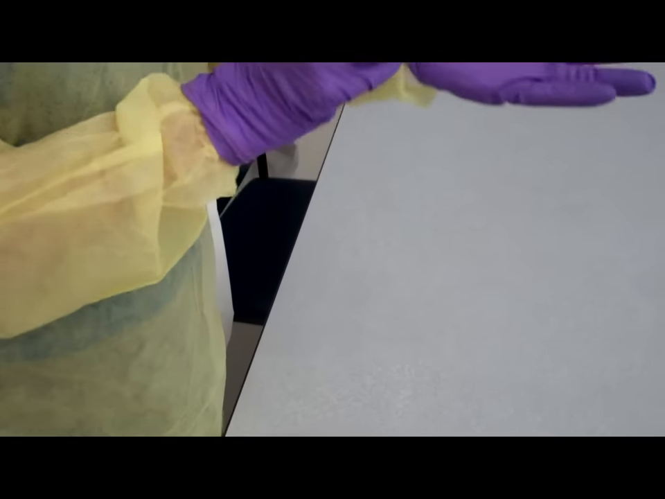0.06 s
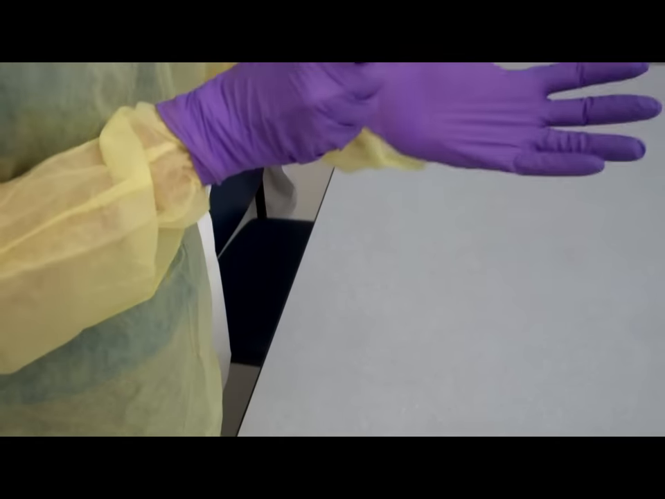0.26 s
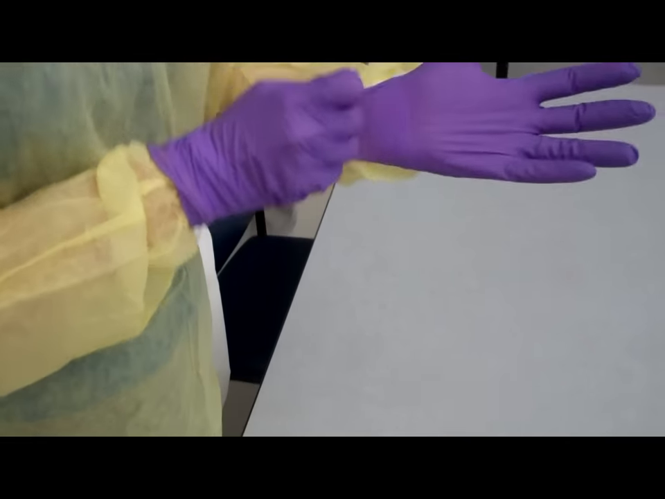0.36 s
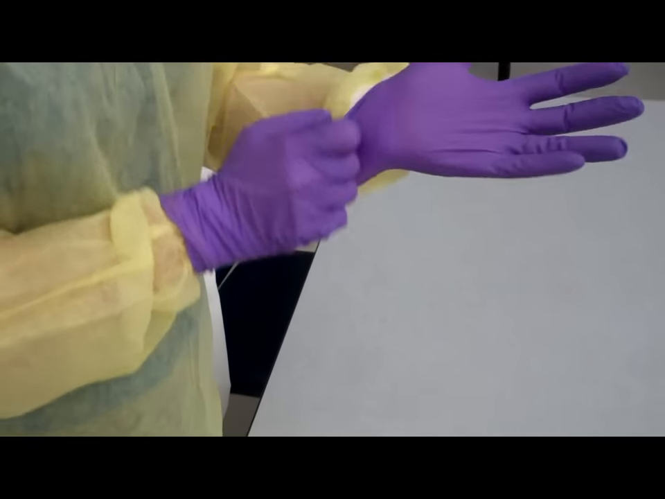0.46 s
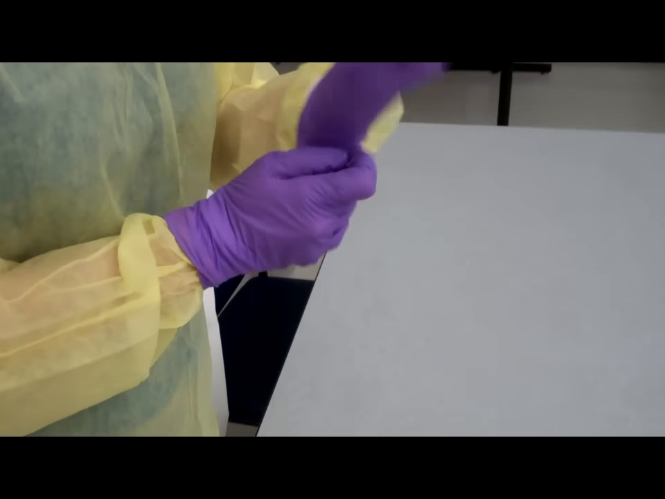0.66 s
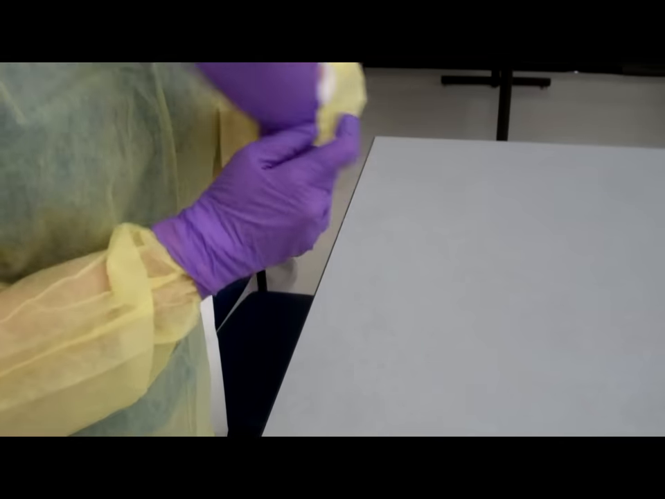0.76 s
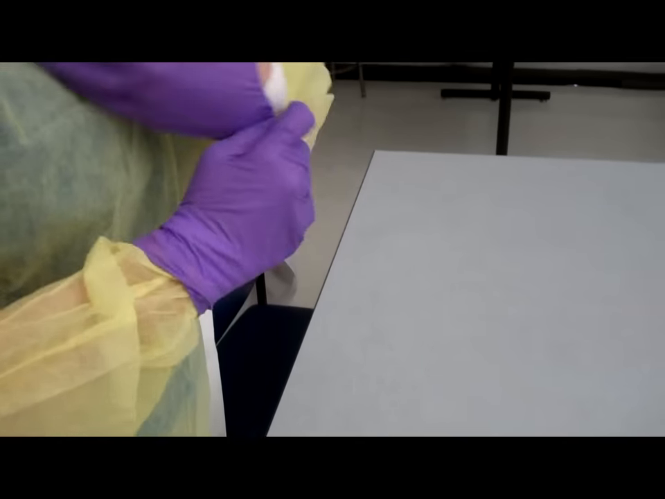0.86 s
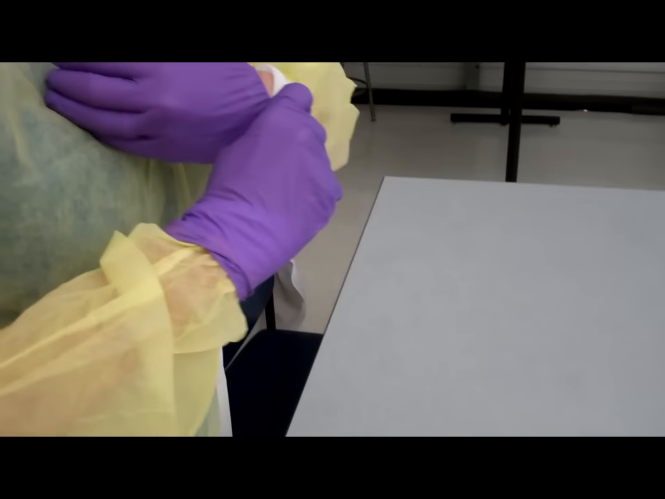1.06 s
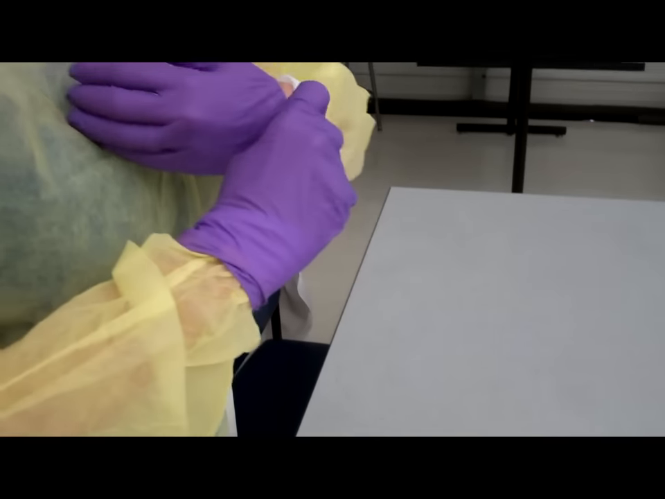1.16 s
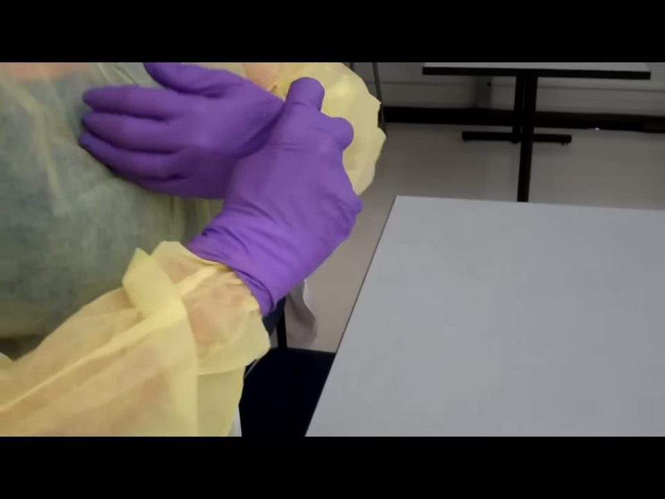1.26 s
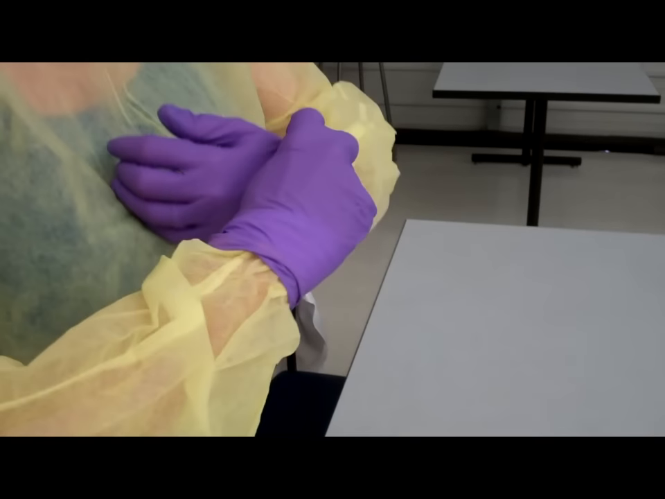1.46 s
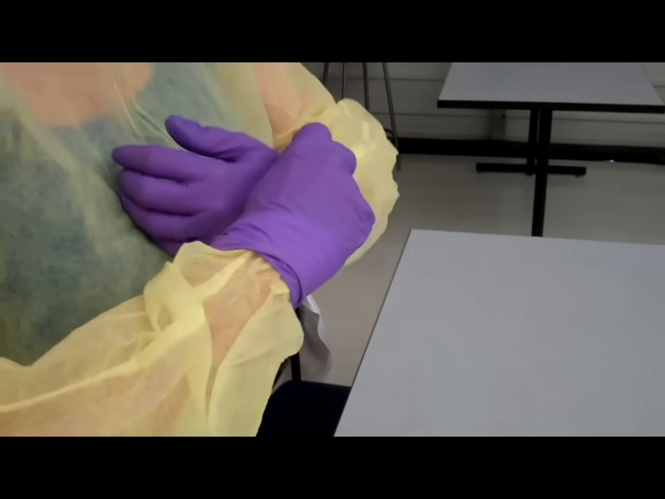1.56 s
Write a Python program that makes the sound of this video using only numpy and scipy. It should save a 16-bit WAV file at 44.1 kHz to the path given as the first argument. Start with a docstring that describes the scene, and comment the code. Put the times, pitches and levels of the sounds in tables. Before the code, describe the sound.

One sharp, close snap of a rubber glove cuff, then soft sliding and cloth rustle.

```python
"""A faint brush of rubber and cloth over humming ventilation, then one sharp snap, close to the microphone.
In a quiet room, beside a table, someone in a thin protective gown pulls on a rubber glove.
The stretched cuff slaps the wrist, and the table top and the walls answer. The gloves then slide over
the sleeves while the gown rustles and creases. In stereo: the snap in the centre, the room around it."""
import sys
import numpy as np
from scipy import signal
from scipy.fft import rfft, irfft
from scipy.io import wavfile

SR = 44100
rng = np.random.default_rng(int(sys.argv[2]) if len(sys.argv) > 2 else 0)


def generate_wav(sig):
    """Save sig (samples, or channels by samples) to the path in sys.argv[1] as 16-bit PCM at SR."""
    pcm = np.round(np.clip(np.atleast_2d(sig).T, -1, 1) * 32767).astype(np.int16)
    wavfile.write(sys.argv[1], SR, pcm)


N = 70560
TIME = np.arange(N) / SR
BIN_HZ = np.arange(N // 2 + 1) * SR / N
CUTOFF_HZ = 14350

# diffuse sound at the microphone, side against mid: f/Hz, level/dB
STEREO_WIDTH = [(60, -20), (200, -21.5), (400, -15), (700, -13), (1300, -8.5), (2400, -4.5), (4400, 0),
                (14000, 3)]
# spectrum of the ventilation's moving air: f/Hz, relative level/dB
AIR_SPECTRUM = [(25, -20), (55, -9), (85, -4.5), (140, -2.5), (260, 0), (450, -4), (850, -7), (1500, -9),
                (2500, -18), (4500, -24.5), (8000, -28), (14000, -24)]
# tones of the ventilation's hum: f/Hz, rms level/dB
HUM_TONES = [(59, -67), (144, -65), (216, -61.5), (288, -62), (360, -63.5), (656, -65.5), (894, -65)]

# soft rustle as the gown moves: t/s, level/dB
RUSTLE_LEVELS = [(0, -47.5), (.12, -49.5), (.2, -45.5), (.26, -49), (.36, -47), (.45, -53.5), (.53, -44.5),
                 (.61, -48.5), (.69, -45.5), (.78, -57), (.84, -58.5), (.9, -51), (1.02, -57), (1.11, -49),
                 (1.2, -52.5), (1.255, -47), (1.39, -57.5), (1.46, -50), (1.51, -46), (1.6, -54)]
# spectrum of the rustling cloth: f/Hz, relative level/dB
RUSTLE_SPECTRUM = [(60, -13), (140, 3), (260, 1), (450, -1), (800, 0), (1400, -3), (2200, -7),
                   (4000, -21.5), (8000, -26.5), (14000, -26)]
# folds of the gown pushing air: t/s, level/dB, half length/s
FOLD_PUFFS = [(.025, -45, 0.018), (.18, -49, 0.03), (.32, -51, 0.04), (1.12, -49, 0.043),
              (1.515, -49.5, 0.024), (1.58, -52, 0.018)]
# spectrum of those low puffs: f/Hz, relative level/dB
PUFF_SPECTRUM = [(50, -17), (100, -0.5), (150, 0), (260, 1.5), (400, -11.5), (800, -12), (2000, -25),
                 (8000, -60)]
# creases that flip: t/s, level/dB, f/Hz, t60/s
CREASE_FLIPS = [(1.2675, -40.5, 3350, .022), (1.327, -42, 3900, 0.025)]

# hiss of rubber sliding over the sleeve: t/s, level/dB
SLIDE_LEVELS = [(0, -49), (.04, -59.5), (.065, -54), (.135, -58.5), (.16, -82), (.21, -57), (.25, -49),
                (.31, -52.5), (.37, -46.5), (.42, -51.5), (.455, -59.5), (.5, -51.5), (.58, -49),
                (.61, -42), (.64, -44.5), (.68, -43.5), (.7, -47.5), (.75, -43), (.792, -45.5),
                (.81, -53.5), (.875, -56), (.91, -47.5), (.94, -54.5), (.98, -56.5), (1.08, -61.5),
                (1.2, -71), (1.26, -56), (1.31, -63), (1.35, -53), (1.39, -55), (1.44, -48.5), (1.49, -58),
                (1.6, -66)]
# spectrum of that hiss: f/Hz, relative level/dB
SLIDE_SPECTRUM = [(600, -6.5), (1500, -6.5), (2500, -1), (3800, 1), (5200, -1), (7500, -1), (10000, -1.5),
                  (13500, 0), (15000, -13)]
# swishes at the fastest moments of the strokes: t/s, level/dB, half length/s
STROKE_SWISHES = [(.12, -56, 0.021), (.565, -54, 0.028), (.618, -42.5, 0.027), (.765, -41.5, 0.03),
                  (.83, -60, 0.033), (.965, -55.5, 0.04)]
# spectrum of those high swishes: f/Hz, relative level/dB
SWISH_SPECTRUM = [(3000, -26), (6000, -25), (9000, -1.5), (12000, -0.5), (14000, 1.5)]

# echoes off the table top and the walls: delay/s, level against the snap/dB, left minus right/dB
EARLY_ECHOES = [(.00158, -13.5, 0.5), (.0064, -37, 1), (0.0221, -32, -5), (0.025, -36, 1),
                (0.0267, -34, -4), (0.043, -32, 18)]
# spectrum of the room's tail: f/Hz, relative level/dB
ROOM_SPECTRUM = [(150, -12), (500, -13), (900, -0.5), (1400, 0.5), (2300, -5), (3400, -3.5), (4600, -16),
                 (8000, -13), (14000, -30)]
# brief ringing of cuff and wrist: f/Hz, level/dB, t60/s
CUFF_RESONANCES = [(660, -19.5, 0.011), (1310, -22.5, 0.0066), (1840, -17.5, 0.0082), (2600, -50, 0.007),
                   (2980, -50, .008), (3940, -30, 0.024)]

SNAP_S, SNAP_DB, SNAP_HZ = .2501, 3, 2430


def from_db(db):
    """Decibels to gain."""
    return 10 ** (np.asarray(db) / 20)


def unit_rms(x):
    """Scale to an rms of 1."""
    return x / np.sqrt(np.mean(x ** 2) + 1e-20)


def level(rows):
    """Gain over time through points of t/s, level/dB."""
    return from_db(np.interp(TIME, *np.transpose(rows)))


def swells(rows):
    """Gain over time as a sum of bell-shaped swells."""
    return sum(from_db(db) * np.exp(-((TIME - t) / half) ** 2) for t, db, half in rows)


def decay(start, t60):
    """Envelope that opens at once and falls 60 dB in t60 seconds."""
    return (TIME >= start) * np.exp(-np.log(1000) * np.maximum(TIME - start, 0) / t60)


def pan(db):
    """Channel gains for a left-minus-right level difference."""
    return from_db(np.array([[.5], [-.5]]) * db)


def bin_gains(rows):
    """Gain at each FFT bin from points of f/Hz, level/dB, joined on a log-frequency axis."""
    hz, db = np.transpose(rows)
    return from_db(np.interp(np.log(BIN_HZ + 1), np.log(hz), db))


def filtered(x, hz, kind, order=2):
    """Butterworth filter."""
    return signal.sosfilt(signal.butter(order, hz, kind, fs=SR, output="sos"), x + 1e-18)


def diffuse(pair, spectrum, width_db):
    """Two unrelated signals become mid and side of one sound, wider in the treble; rms 1."""
    mid, side = rfft(pair) * bin_gains(spectrum) * (BIN_HZ < CUTOFF_HZ + 500)
    side = side * bin_gains(STEREO_WIDTH) * from_db(width_db)
    return unit_rms(irfft([mid + side, mid - side], N))


def noise(spectrum, width_db=0):
    """Smooth stereo noise with this spectrum."""
    return diffuse(rng.standard_normal((2, N)), spectrum, width_db)


def slips(per_s, spread_db):
    """Two trains of tiny random clicks: fibres catching and letting go."""
    sizes = from_db(spread_db * np.minimum(rng.exponential(1, (2, N)), 4))
    slipping = rng.random((2, N)) < per_s / SR
    return slipping * sizes * rng.choice([-1, 1], (2, N))


def ventilation(air_db=-49, waver_db=2, waver_hz=8.3):
    """Room tone: steady moving air, and a hum whose tones each waver in level."""
    hum = 0
    for hz, db in HUM_TONES:
        waver = unit_rms(filtered(rng.standard_normal(2 * N), waver_hz, "low")[N:])
        tone = np.sqrt(2) * np.sin(2 * np.pi * (hz * TIME + rng.random()))
        hum += from_db(db + waver_db * waver) * tone
    return from_db(air_db) * noise(AIR_SPECTRUM) + hum


def gown_rustle():
    """Loose cloth shifts with the arms: dull fibre slips, and puffs of air from the folds."""
    fibres = diffuse(slips(per_s=2800, spread_db=2), RUSTLE_SPECTRUM, width_db=-2)
    puffs = swells(FOLD_PUFFS) * noise(PUFF_SPECTRUM)
    return level(RUSTLE_LEVELS) * fibres + puffs


def gown_creases(edge_ratio=1.12):
    """Each crease flips with a short, narrow-band crackle."""
    white = noise([(100, 0), (14000, 0)])
    crackles = 0
    for t, db, hz, t60 in CREASE_FLIPS:
        band = filtered(white, [hz / edge_ratio, hz * edge_ratio], "band", order=1)
        crackles += from_db(db) * decay(t, t60) * unit_rms(band)
    return crackles


def glove_slide():
    """Rubber drags over the sleeve: dense slips, and high swishes a little right of centre."""
    fibres = diffuse(slips(per_s=9000, spread_db=3), SLIDE_SPECTRUM, width_db=-10.5)
    swishes = swells(STROKE_SWISHES) * noise(SWISH_SPECTRUM, width_db=-7)
    return level(SLIDE_LEVELS) * fibres + pan(db=-2.5) * swishes


def slap(start, hz):
    """Pressure pulse of rubber stopped by the wrist: a crest between two troughs."""
    offset_squared = (np.pi * hz * (TIME - start)) ** 2
    pulse = (1 - 2 * offset_squared) * np.exp(-offset_squared)
    return filtered(pulse, hz=570, kind="high", order=1)


def room_answer(echo_hz=2000, tail_db=-38.5):
    """The snap comes back duller off the near table top and the farther walls, then as a diffuse tail."""
    echoes = sum(from_db(SNAP_DB + db) * pan(pan_db) * slap(SNAP_S + delay, echo_hz)
                 for delay, db, pan_db in EARLY_ECHOES)
    envelope = decay(SNAP_S, t60=0.66) - decay(SNAP_S, t60=0.005)  # builds fast, fades slowly
    return echoes + from_db(tail_db) * envelope * noise(ROOM_SPECTRUM)


def cuff_snap(left_lag_s=.000011, thump_hz=170):
    """Close up, the cuff hits the wrist: a sharp-edged pulse, a bright crack, a thump of flesh, a ring."""
    age = TIME - SNAP_S
    arrival = SNAP_S + left_lag_s * np.array([[.5], [-.5]])
    pulse = from_db(SNAP_DB) * slap(arrival, SNAP_HZ)
    leading_edge = from_db(-23.5) * slap(arrival - 0.32 / SNAP_HZ, hz=6700)
    crack = from_db(-29.5) * decay(SNAP_S, t60=0.027) * rng.standard_normal((2, N))
    thump = -from_db(-37) * decay(SNAP_S, t60=0.015) * np.sin(2 * np.pi * thump_hz * age)
    ring = sum(from_db(db) * decay(SNAP_S, t60) * np.cos(2 * np.pi * hz * age)
               for hz, db, t60 in CUFF_RESONANCES)
    return pulse + leading_edge + crack + thump + filtered(ring, hz=7500, kind="low")


def scene():
    """Everything that reaches the microphone, from the room tone to the snap."""
    return ventilation() + gown_rustle() + gown_creases() + glove_slide() + room_answer() + cuff_snap()


def record(dry, ceiling=.94):
    """The snap just overloads the recorder, and a steep filter cuts the highest treble."""
    clipped = np.clip(dry, -ceiling, ceiling)
    return irfft(rfft(clipped) / np.sqrt(1 + (BIN_HZ / CUTOFF_HZ) ** 500), N)


dry = scene()
out = record(dry)
generate_wav(out)
```